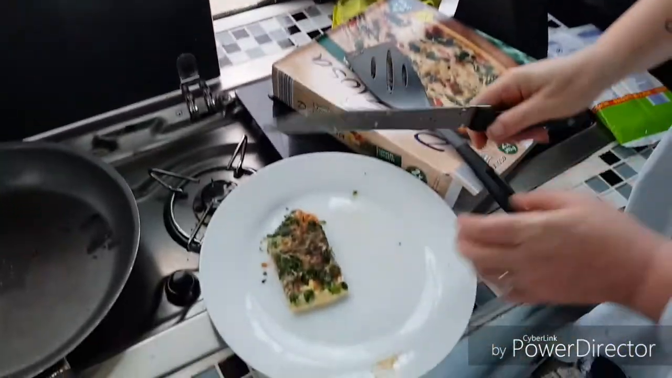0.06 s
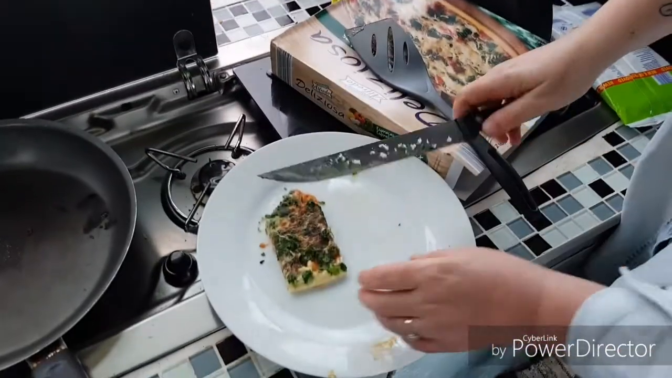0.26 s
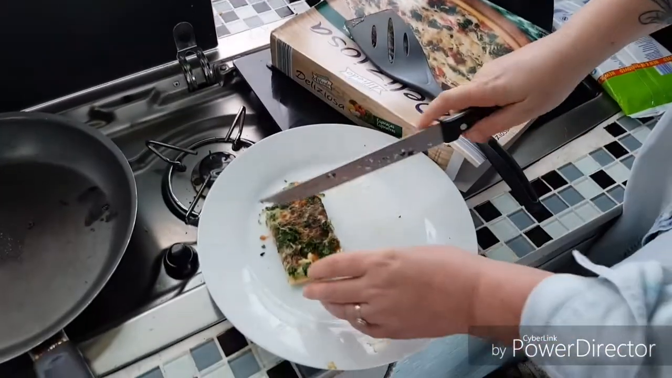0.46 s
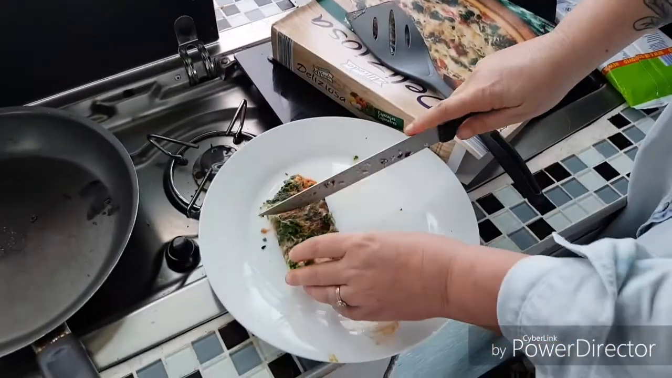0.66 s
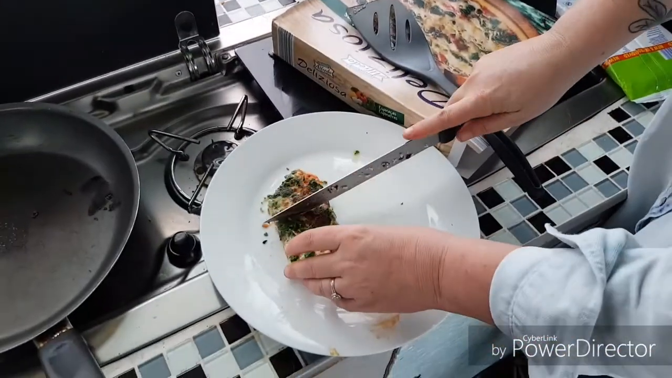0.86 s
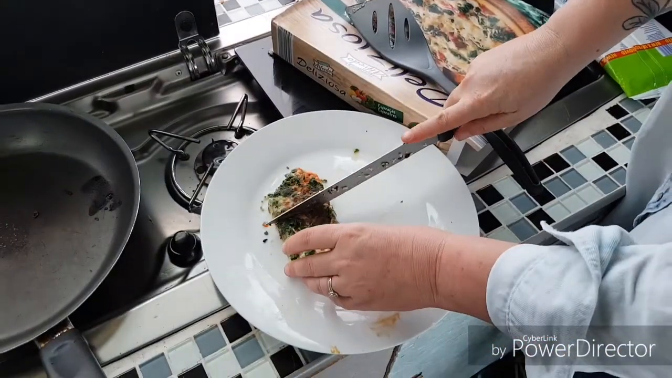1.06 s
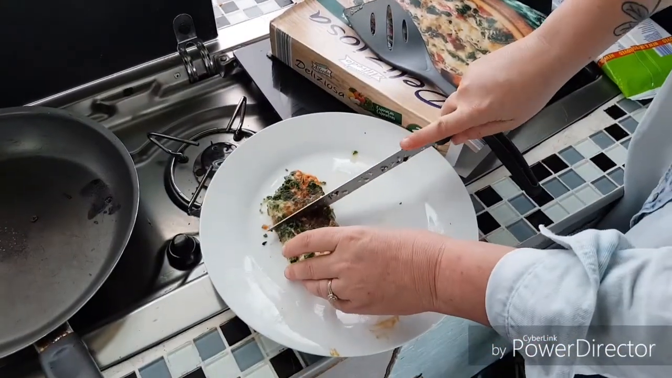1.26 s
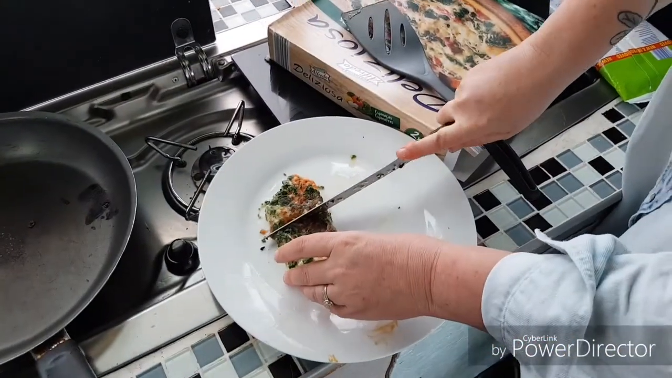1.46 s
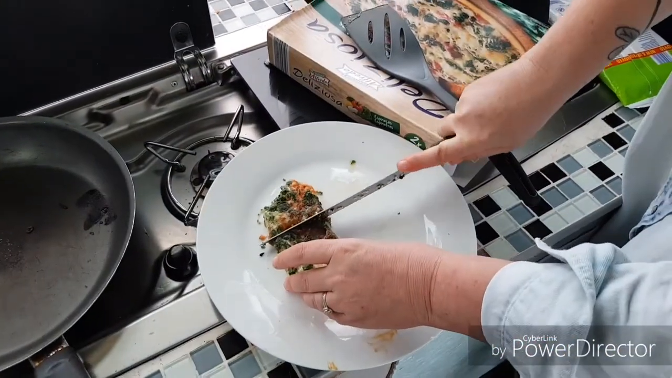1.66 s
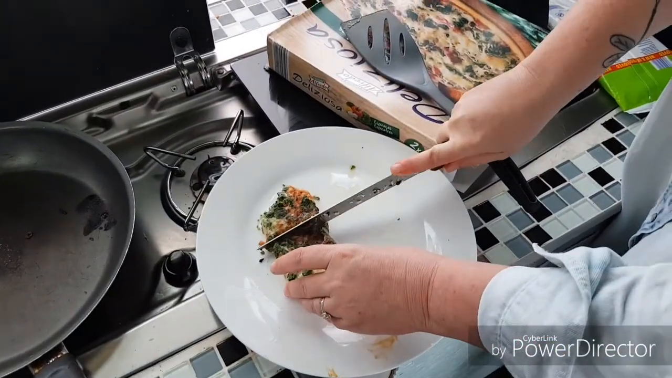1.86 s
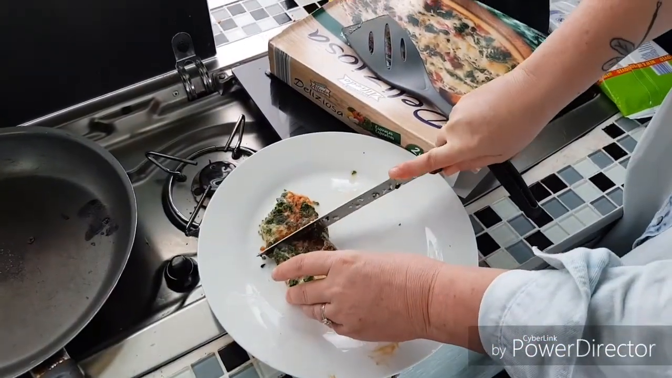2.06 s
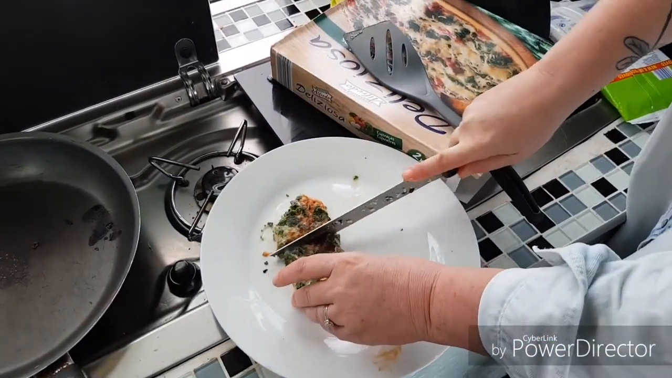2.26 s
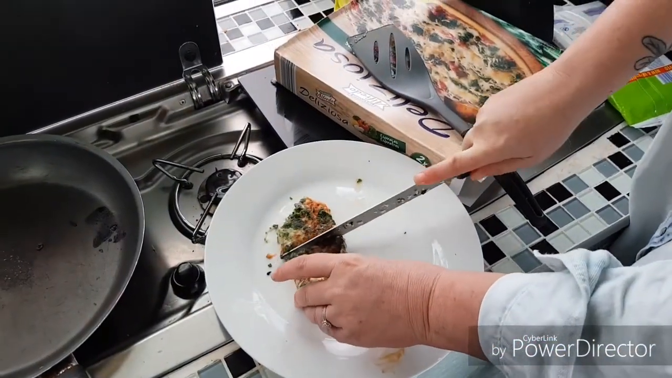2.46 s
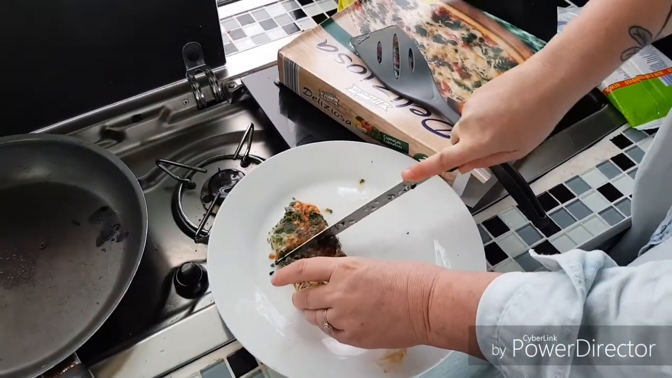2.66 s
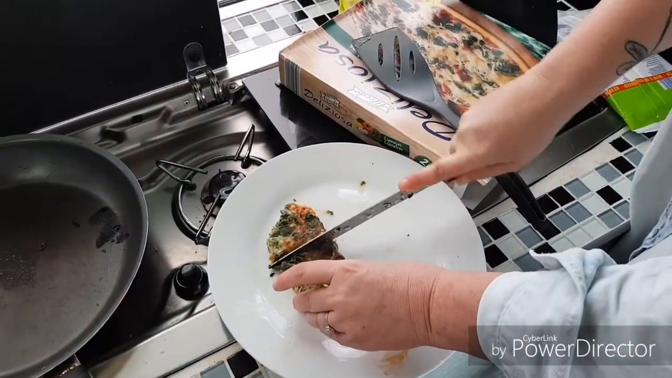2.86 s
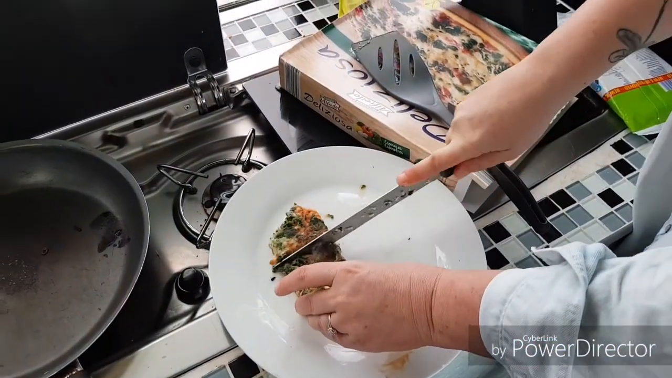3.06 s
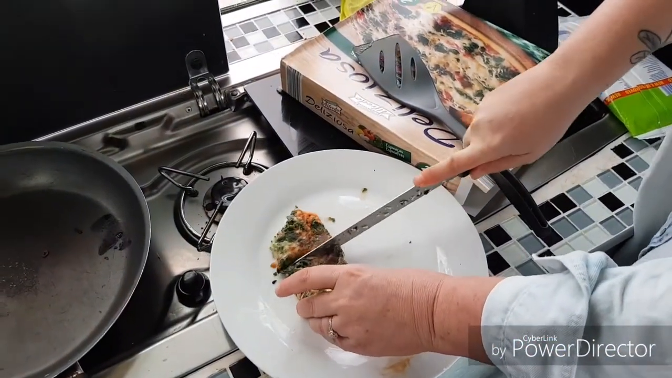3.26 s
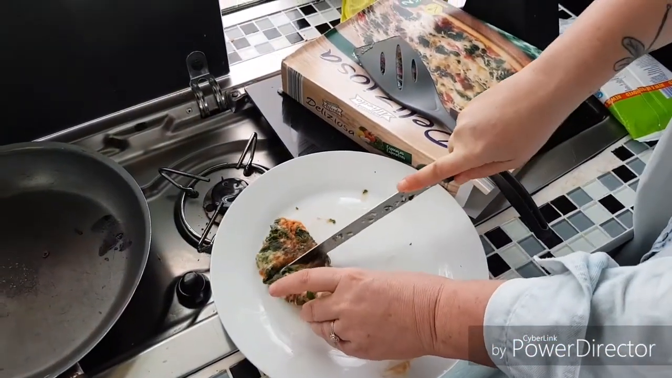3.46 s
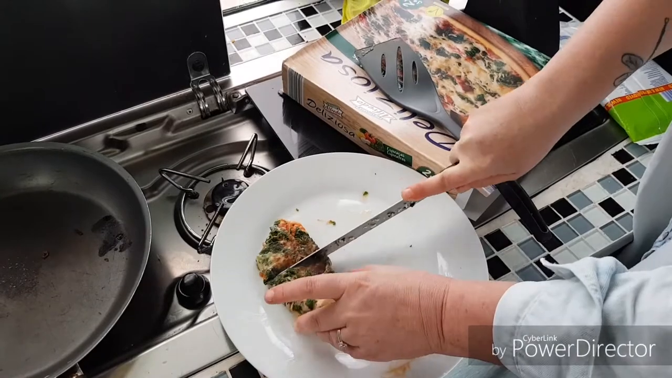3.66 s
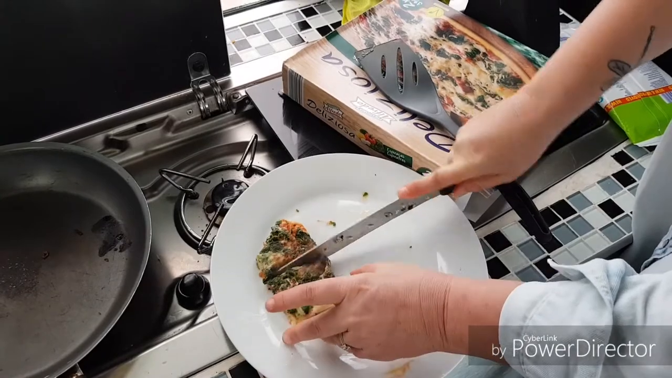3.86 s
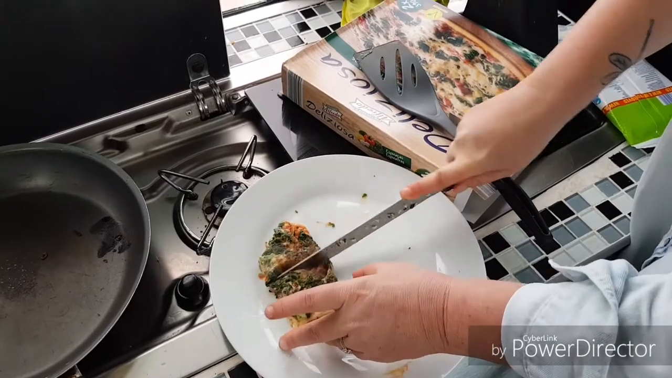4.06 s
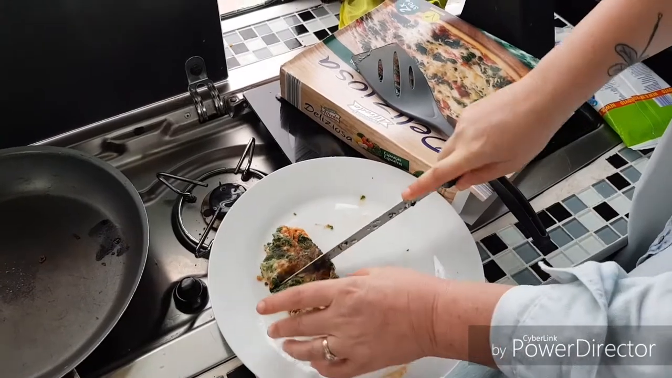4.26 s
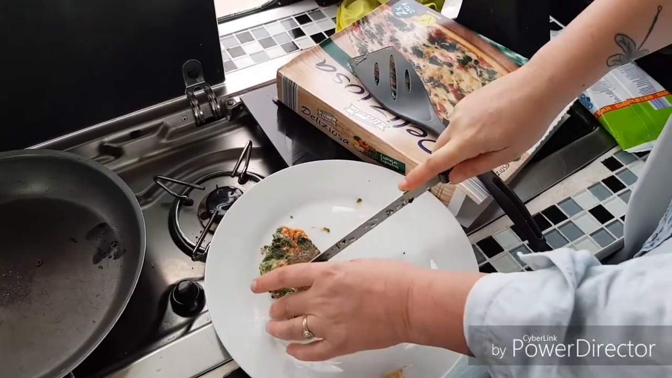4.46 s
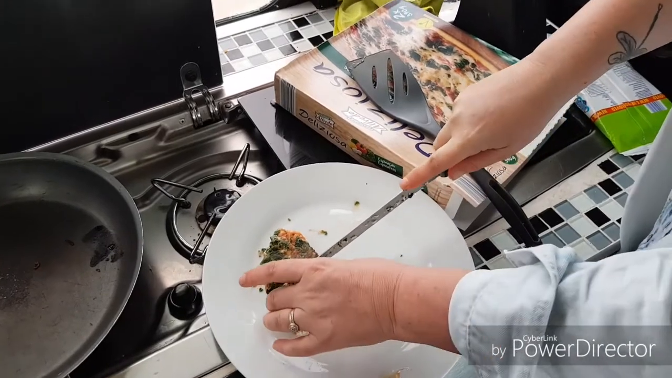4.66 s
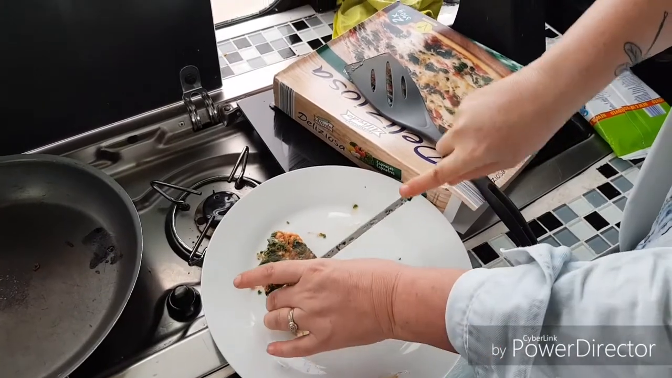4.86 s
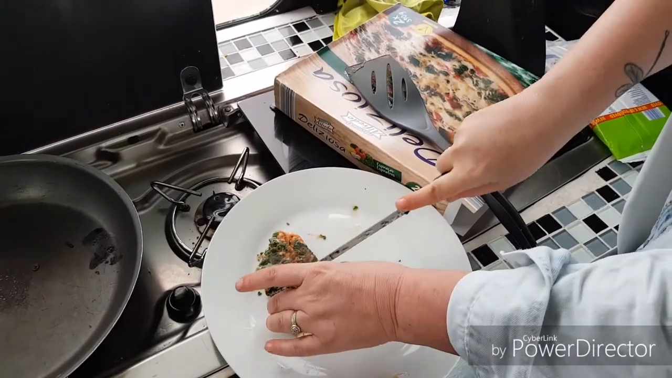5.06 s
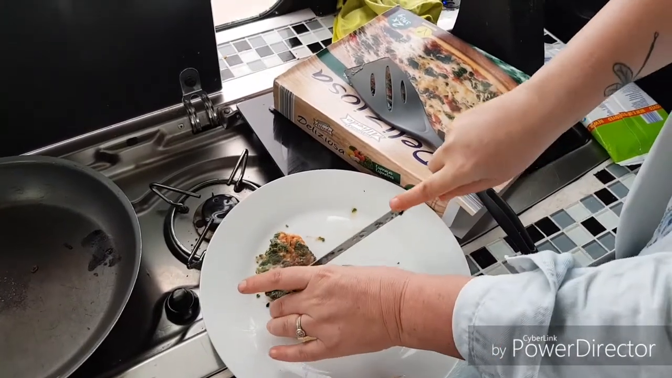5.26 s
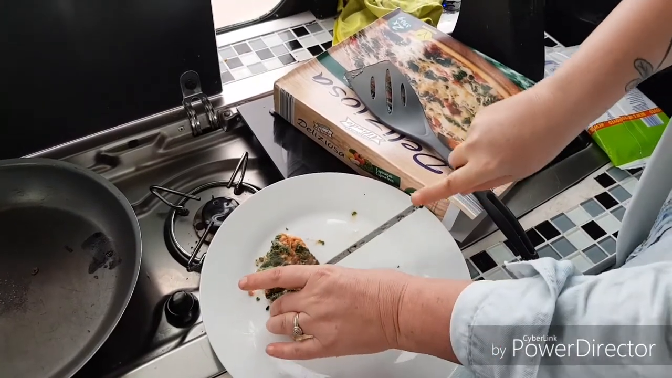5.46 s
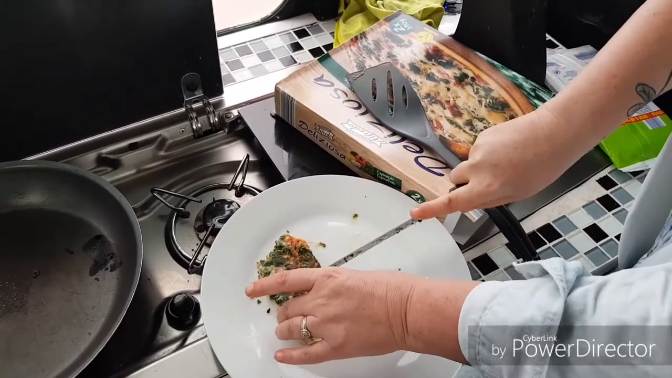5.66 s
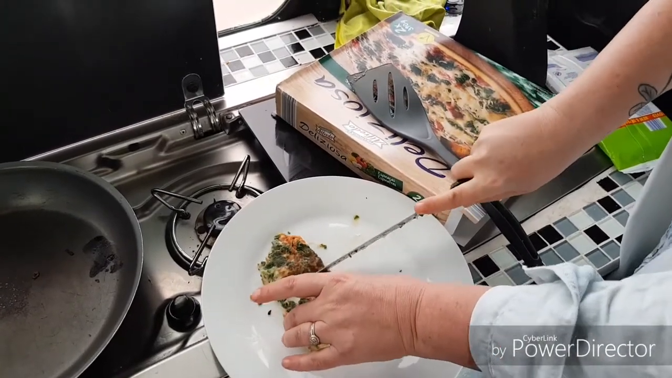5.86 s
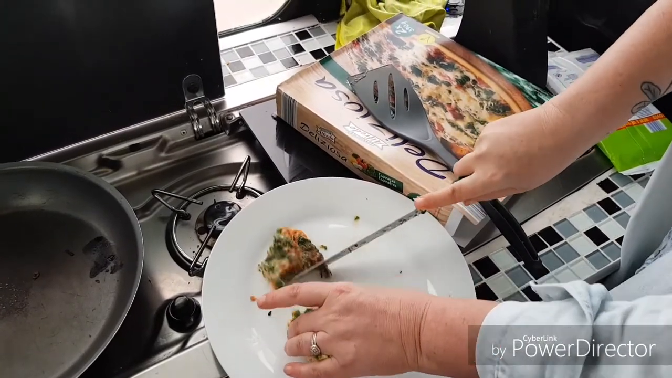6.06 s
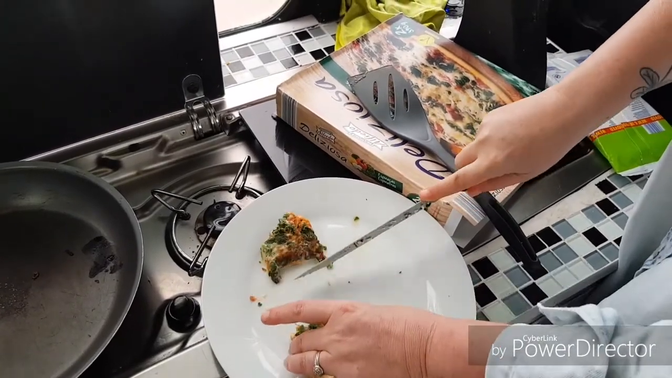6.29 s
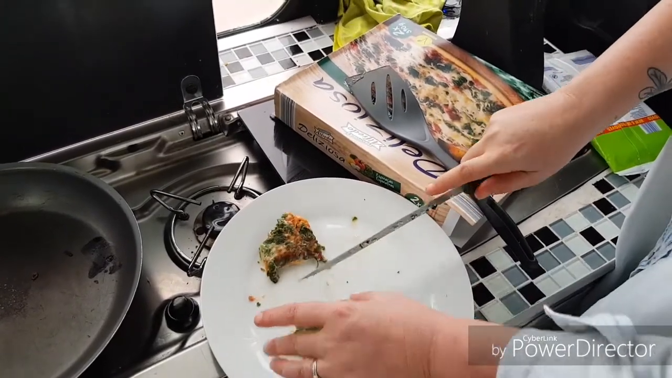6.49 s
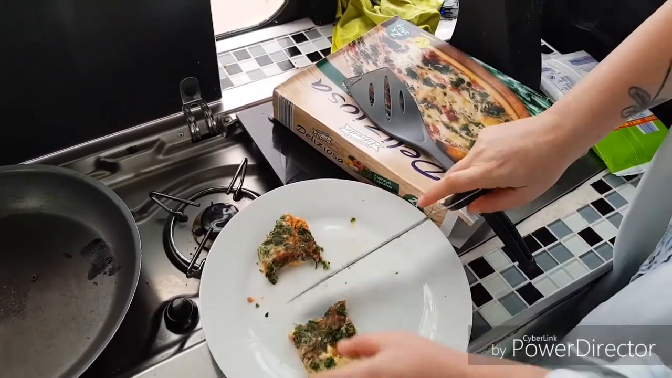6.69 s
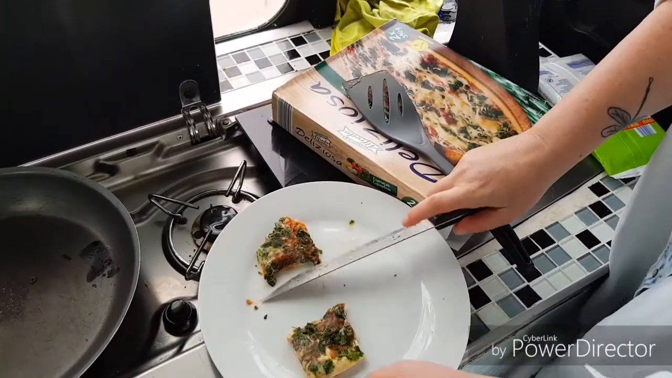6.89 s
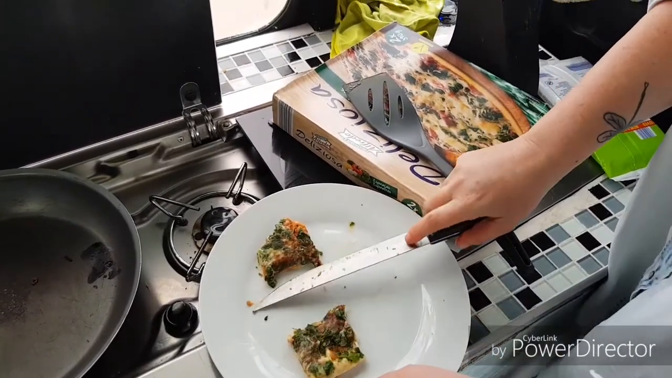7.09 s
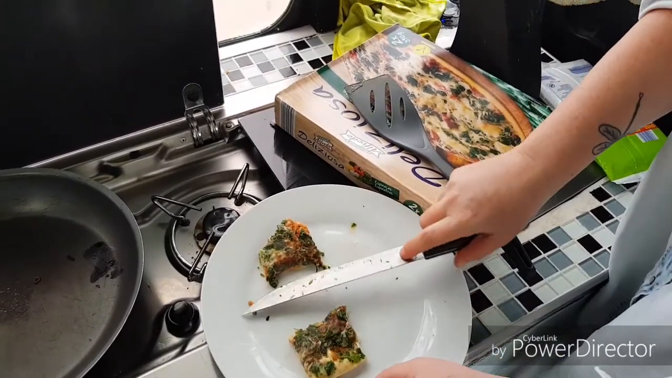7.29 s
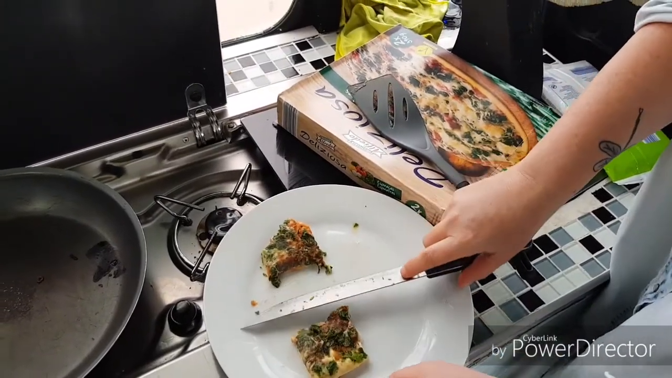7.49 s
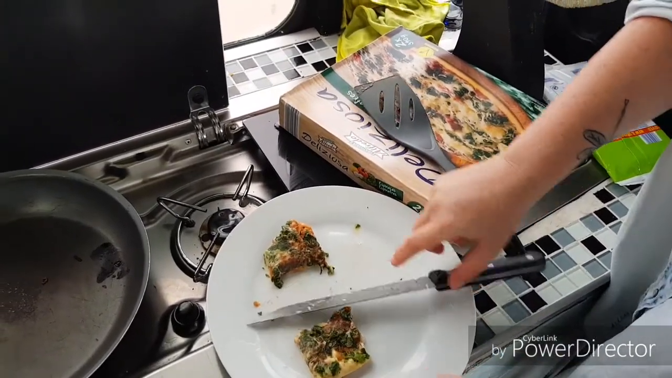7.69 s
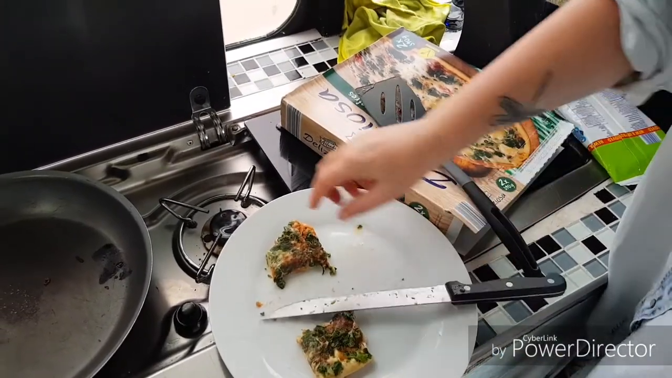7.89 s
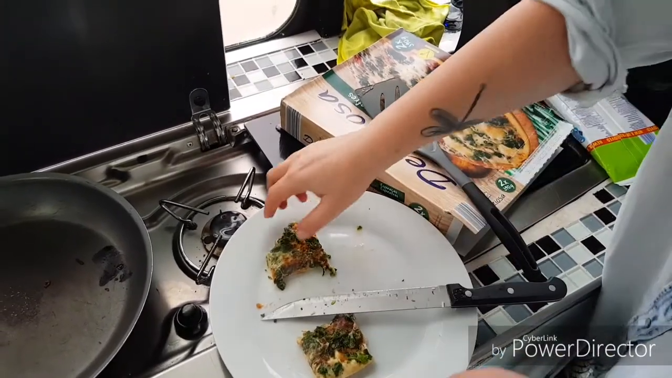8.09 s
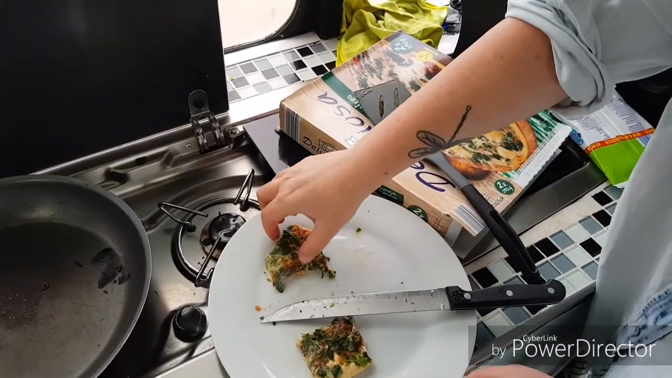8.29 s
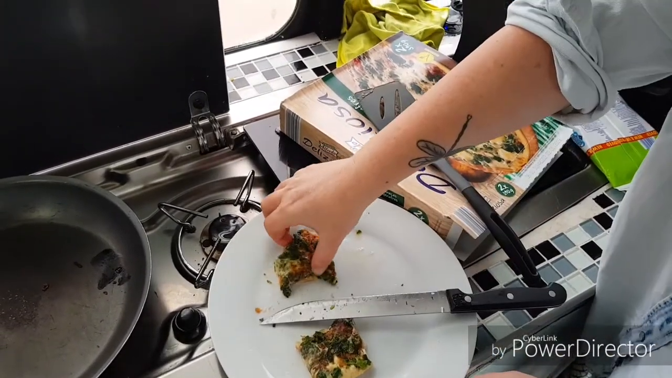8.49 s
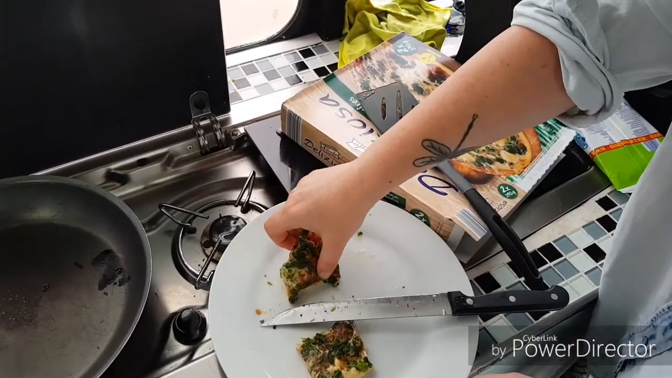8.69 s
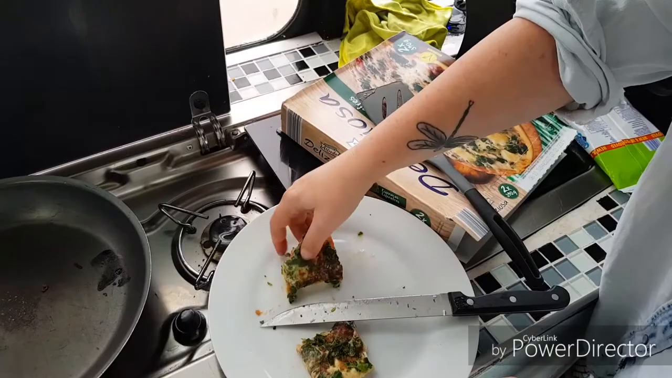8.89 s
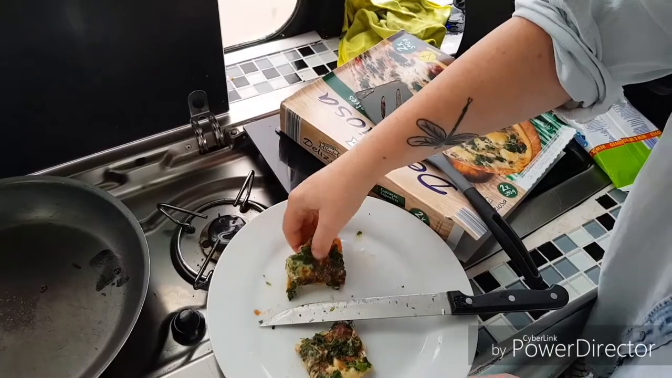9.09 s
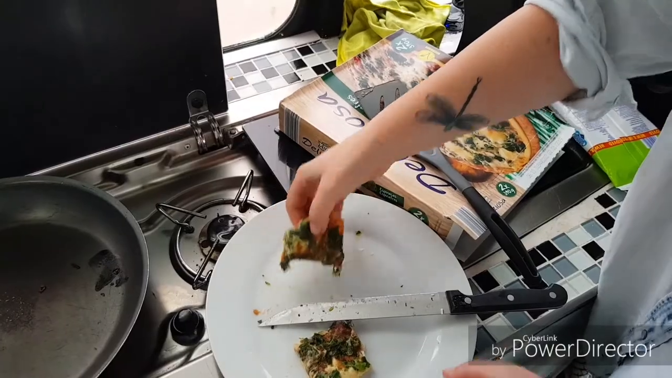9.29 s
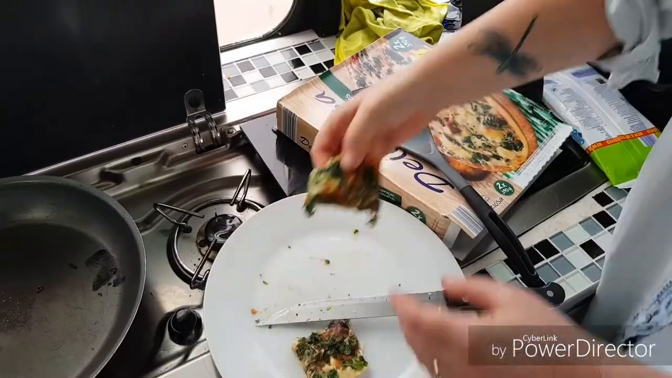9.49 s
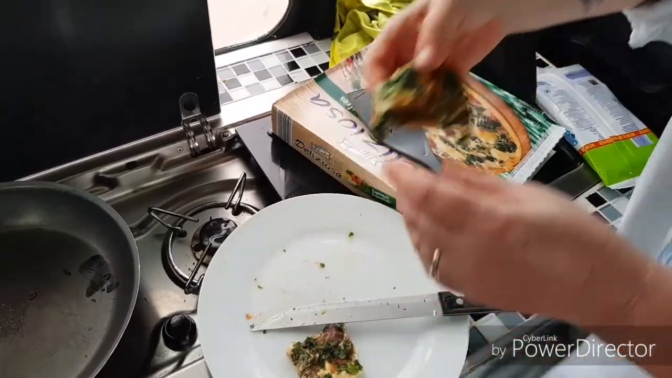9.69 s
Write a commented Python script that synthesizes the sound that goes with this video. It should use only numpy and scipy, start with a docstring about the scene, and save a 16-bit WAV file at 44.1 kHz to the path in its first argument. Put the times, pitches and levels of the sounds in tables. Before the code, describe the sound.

Soft crust crackles and faint scraping, then hard steel-on-china clinks, a brief squeak, and a dropped knife rattling on a plate in a small kitchen.

```python
"""Knife and crust on a china plate

A steel knife saws through a crusty slice on a china plate in a small kitchen, close to a phone.
It breaks through and clinks, slides on the glaze, is tapped down and dropped across the rim, where it bounces.
Clinks, slides and rattle excite decaying modes of plate and blade; a bare squeak is a wavering tone.
Crust crackles in short noise bursts; shaped noise makes the low room hum, rustling sleeves and hiss.
"""
import sys
import numpy as np
from scipy import signal
from scipy.fft import rfft, irfft, next_fast_len
from scipy.io import wavfile
from scipy.ndimage import uniform_filter1d, minimum_filter1d, map_coordinates

SR = 44100
rng = np.random.default_rng(int(sys.argv[2]) if len(sys.argv) > 2 else 0)


def dump_mix(stems):
    """Bounce the given channels to the path in sys.argv[1] as a 16-bit WAV at rate SR."""
    frames = np.atleast_2d(stems).T  # one column per channel
    limited = np.clip(frames, -1, 1)  # hard clip at full scale
    pcm = np.round(limited * 32767).astype(np.int16)
    wavfile.write(sys.argv[1], SR, pcm)


N = 429616

# Relative room hum level over time: time_s, level_db
ROOM_LEVEL = [(0, -46), (3, -46), (4.4, -47.5), (5.3, -45.5), (6.9, -47), (7.3, -49.5), (8.1, -46),
              (8.5, -48.5), (9.74, -45)]
# Hands and sleeves moving, before random wavering: time_s, rustle_db, hiss_db
STIR = [(0, -67.5, -69), (.22, -63.5, -61.5), (.59, -64.5, -59.5), (.7, -66, -67), (1.65, -67.5, -67.5),
        (1.95, -62, -62.5), (2.55, -65.5, -67.5), (2.9, -64, -61), (3.47, -67, -61), (3.75, -60.5, -65.5),
        (4.3, -76.5, -68), (5.0, -68, -67.5), (5.55, -66.5, -64), (6.4, -68, -71.5), (6.7, -62, -64),
        (7.3, -68.5, -67), (7.7, -70.5, -70.5), (8.25, -64.5, -69.5), (8.45, -73, -69.5), (8.92, -68, -72),
        (9.12, -57.5, -64.5), (9.21, -73.5, -73), (9.4, -58, -67), (9.57, -68, -68.5), (9.74, -63.5, -66)]
# Relative noise spectra of room hum, cloth and food, and fine hiss: freq_hz, density_db (per Hz)
HUM_SPECTRUM = [(12, -40), (20, -13.5), (81, 1.5), (144, -1.5), (205, -6.5), (293, -5.5), (325, -7.5),
                (384, -7.5), (427, -11.5), (474, -12), (1070, -18), (1600, -25), (3000, -40.5),
                (3900, -61.5), (6600, -120)]
RUSTLE_SPECTRUM = [(900, -35), (1800, 5), (2700, -7.5), (3600, 0), (5000, -9), (7500, -47.5), (9000, -52.5)]
HISS_SPECTRUM = [(3000, -1), (6000, 0.5), (9000, -3.5), (12500, -2), (14000, -5.5), (16000, -14.5)]
# Left-right likeness of the noises: freq_hz, correlation (-1 to 1)
STEREO_LIKENESS = [(60, 0.98), (180, 0.97), (550, 0.75), (1650, -0.3), (4970, 0.14), (15000, -0.22)]
# Crust cracking, relative levels: start_s, peak_db, pitch_hz
CRACKS = [(0.1785, -41, 7920), (0.5367, -48, 3400), (1.0703, -52, 3280), (1.3316, -45, 3690),
          (1.435, -51, 4220), (1.61, -49.5, 3000), (1.84, -47, 4500), (2.0369, -43.5, 9930),
          (2.2528, -44.5, 5810), (2.2814, -47, 8000), (2.305, -44.5, 6000), (2.5197, -49, 3580),
          (2.5794, -52.5, 3700), (2.9001, -44, 3720), (3.608, -54, 6000), (4.367, -49, 4660),
          (4.8087, -52.5, 3305), (4.9293, -50.5, 3900), (5.3644, -52.5, 3970), (5.5872, -41, 10980),
          (5.7014, -42, 3654), (6.1255, -50, 3900), (6.3494, -48, 4620), (6.8171, -54, 5285),
          (7.0768, -51, 3800), (7.5387, -49.5, 3890), (7.6972, -50, 10720), (8.1899, -49, 4510),
          (8.2182, -46.5, 4250), (8.3838, -53, 5120), (8.4974, -49, 7480), (8.6923, -55, 5075),
          (9, -51, 3600), (9.0615, -54, 11000), (9.0743, -50, 11000), (9.1162, -47.5, 3880),
          (9.2945, -54, 6000), (9.3816, -50.5, 3560), (9.7037, -51.5, 3580)]
# Knife on china, relative levels: start_s, pressed_db, tapped_db, loose_db, bowl_db, treble_db,
# damping_x (by hand and food)
CLINKS = [(1.346, -54, -53.5, -68, -52, 5, 3), (1.7829, -41.5, -48, -49, -42, 4.5, 3.1),
          (1.98, -46, -50, -70, -47, 6, 4.4), (2.744, -52, -60.5, -74, -55, 0.5, 3.7),
          (2.976, -27, -27.5, -70, -26.5, 0.7, 4.1), (3.1363, -60, -50, -73, -47.5, 0.3, 3),
          (3.349, -56, -37, -75, -37, 10, 4.55), (3.364, -64, -41.5, -69, -59, 6.5, 4.6),
          (3.425, -51, -60.5, -57.5, -55, 11, 4.3), (3.4388, -59, -47.5, -45.5, -52, 8.5, 3.2),
          (3.4844, -61, -48.5, -62, -47, 3, 4.9), (3.511, -59, -59, -45, -46, 6, 4.4),
          (3.7192, -51, -50, -69, -44.5, 1, 3.6), (3.747, -39, -39.5, -76, -35, 0.5, 5.8),
          (3.7734, -41, -44, -73, -40, 0, 4.2), (3.7901, -61, -39.5, -68, -43, 4, 4.2),
          (5.1499, -11.5, -63.5, -74, -20, -3.5, 3.2), (5.3645, -47.5, -80, -75, -55, -3.5, 3.2),
          (5.586, -50, -68, -75, -47, 3, 2.9), (5.6327, -17.5, -38, -67, -24, -4, 3.7),
          (5.8657, -52, -77.5, -62, -49, -12, 2.5), (6.171, -42, -75, -75, -51, -6.5, 1.9),
          (6.329, -53, -70, -60, -44, -3, 3.2), (6.6298, -54, -64.5, -67, -68, 4.5, 2.2),
          (6.883, -31, -19, -48.5, -16, -5.5, 1.3), (6.9064, -61, -18, -42.5, -17.5, -2, 2.13),
          (7.2404, -55, -61.5, -73.5, -72, 9, 1.93), (7.5115, -84, -65, -52.5, -60.5, 8, 1.6),
          (7.7305, -41, -50, -72, -43, 3.5, 0.67), (7.7372, -34, -42, -74, -36, 0.5, 0.64),
          (7.7563, -30, -35, -76, -33.5, 1, 2.23), (7.7865, -32, -42, -40, -54, 0, 3.4),
          (7.7957, -33.5, -49.5, -60, -48, 4, 1.7), (7.8981, -53, -32.5, -15.5, -16, 1.5, 2.2),
          (7.9472, -39, -44.5, -24.5, -29, 4, 1.8), (7.9629, -41, -46, -16.5, -44, 0, 3.5),
          (7.9824, -57, -35, -37.5, -35, 10, 3.2), (8.027, -46, -61.5, -43, -50, 3.5, 2.4),
          (8.0548, -48, -44.5, -27.5, -23, 4, 2.1), (8.0859, -34, -52.5, -38.5, -39, -0.5, 1.9),
          (8.1388, -35.5, -65, -43.5, -41, -0.3, 2.7)]
# Modes of plate and blade in contact: freq_hz
CONTACT_HZ = [382, 641, 716, 1104, 1272, 1314, 1354, 1495, 1745, 1970, 2140, 2300, 2410, 2665, 3490, 3663,
              4050, 4400, 4607, 5303, 6165, 6978, 7870, 8527, 9400, 9930, 10730, 11580]
# The same modes, nominal ring: pressed_db (through food), tapped_db (bare glaze), loose_db (knife lying),
# t60_s, lean_db (left over right), lead_rad (left ahead)
CONTACT_MODES = [(-17, -11, -4.5, 0.24, -2, -0.15), (-17, -28, -11.0, 0.54, 2.5, 1.3),
                 (-11, -49, -12.5, 0.078, 3, 1.2), (-37.5, -29.5, -6.5, 0.1, 0.5, -1.3),
                 (-35.5, -27, -6.5, 0.3, -1, 3), (-33.5, -21.5, -5.5, 0.1, -6.5, 0),
                 (-27.5, -24.5, -10.5, 0.044, -2, -1.1), (-13.5, -17, -10.5, 0.3, -0.8, 3),
                 (-17.5, -10, -30.5, 0.24, -5.5, 3.5), (-0.5, -28, -12, 0.11, -4.5, 1.37),
                 (-11.5, -3, -15, 0.12, -5.3, 1.3), (-18, -1.5, 0, 0.082, 5, 3),
                 (-1, -2, -45.0, 0.07, 8.5, 1.15), (-29.5, -20, -4.5, 0.046, -2.5, -2.5),
                 (-8, -15.5, -15, 0.1, -2.5, 1), (-10, 0.5, -40, 0.088, 8.5, 1.5),
                 (-3.5, -11.5, -52, 0.095, -1, -1.5), (-22.5, -13, -16.5, 0.12, 4, -1),
                 (-11, -4, -17.0, 0.068, 8.5, 2), (-21.5, -14.5, -20.5, 0.1, -13, 1),
                 (-17, -12, -27, 0.14, -7.5, 1.5), (-29.5, -7, -18.5, 0.14, 3.5, 4.5),
                 (-28.5, -11, -28.5, 0.34, 5, 0.44), (-32.5, -15.5, -30, 0.18, 2, 3.5),
                 (-35, -14.5, -47.5, 0.12, 3, 2), (-25, -3.5, -39.5, 0.2, -3.5, 2),
                 (-43, -17.5, -35.5, 0.26, 1.5, -2.2), (-51, -15, -15.5, 0.079, 3.3, -1.9)]
# The plate's main mode, then steel tip and shank modes: freq_hz, level_db, t60_s, lean_db, lead_rad
BOWL = (1537, 0, .2, -5.5, -.1)
TIP = [(12390, -6, .1, 6, .2), (12520, 0, .11, 3, -.5), (12740, -9, .1, 5, .2)]
SHANK = (1922, 0, .3, .5, 1.2)
# How each strike reaches the tip, and leans left over right: pressed_db, tapped_db, loose_db
TIP_REACH_DB = [-29, -14, -24.5]
STRIKE_LEAN_DB = [1.4, 2, -0.3]
# The edge slides on the glaze: start_s, peak_s, end_s, level_db, bowl_db
SLIDES = [(2.76, 2.955, 2.958, -56, -57.5), (2.995, 3.0, 3.04, -51.5, -53), (3.14, 3.17, 3.29, -55, -57.5),
          (3.37, 3.385, 3.45, -59, -69), (3.4, 3.515, 3.55, -53, -52), (5.02, 5.1, 5.135, -52, -51),
          (5.125, 5.142, 5.144, -36, -37.5), (5.166, 5.17, 5.263, -34.5, -40),
          (5.34, 5.376, 5.45, -48, -53.5), (5.39, 5.45, 5.53, -52.5, -52),
          (5.575, 5.626, 5.629, -40.5, -40), (5.845, 5.868, 5.9, -52.5, -55.5),
          (5.89, 5.998, 6.06, -62, -60), (6.14, 6.224, 6.3, -36, -42), (6.3, 6.33, 6.38, -52, -47)]
# Contacts that set the shank ringing: start_s, level_db
SHANK_RINGS = [(2.9765, -49), (5.151, -33.5), (5.6335, -41), (6.8845, -41), (7.755, -51), (7.797, -38.5),
               (7.8999, -21.5), (7.946, -23), (7.963, -16.5), (8.055, -42)]
# The edge sticks and slips on the glaze, nominal path: time_s, pitch_hz, level_db
SQUEAK = [(6.165, 3800, -62), (6.179, 3996, -49.5), (6.245, 4060, -37), (6.28, 3670, -71)]
# The loose knife rocks on the rim: start_s, peak_s, end_s, level_db
RATTLE = [(7.737, 7.74, 7.82, -30.5), (7.794, 7.798, 7.86, -37.5), (7.902, 7.905, 8.08, -19.5),
          (8.054, 8.059, 8.15, -21.5)]
# Room decay: freq_hz, t60_s
KITCHEN_DECAY = [(300, 0.39), (2000, 0.097), (10000, 0.11)]

TOP_HZ = 15850  # upper limit of the phone's band
CUT_ENDS_S = 6.7
CHATTER_IN_FOOD_MS, CHATTER_BARE_MS = 5.6, 9.5  # food quiets the blade; bare, it chatters longer
YIELD, CHOKE_S = 0.26, 0.0026  # a contact this fraction as strong stops half the earlier ring; time it takes
TIP_KNEE_DB = -23  # taps harder than this whip the tip ever more
EDGE_DB, BEND = 24.5, 1.25  # drop from a stroke's peak to its ends; over 1 rounds the peak


def amp(db):
    """Gain of a level in dB."""
    return 10 ** (np.asarray(db) / 20)


def unit(x):
    """Scaled to rms 1."""
    return x / np.sqrt(np.mean(x ** 2) + 1e-20)


def onset(t, rise_s):
    """Exponential rise from silence, with time constant rise_s."""
    return 1 - np.exp(-t / rise_s)


def add_at(out, start_s, sound):
    """Mix a sound into out at its start time."""
    start = round(start_s * SR)
    out[..., start:start + sound.shape[-1]] += sound


def along(points, hz):
    """Values at given frequencies, read on a log axis."""
    f, value = np.transpose(points)
    return np.interp(np.log(hz + 1), np.log(f + 1), value)


def curves(rows):
    """One value per sample for each column after the time."""
    s, *columns = np.transpose(rows)
    return [np.interp(np.arange(N) / SR, s, column) for column in columns]


def wobble(rate):
    """A smooth random curve, rate knots a second."""
    knots = rng.standard_normal(int(N * rate / SR) + 4)
    return map_coordinates(knots, [np.arange(N) * rate / SR])


def filtered(x, response):
    """x times a complex response of frequency."""
    size = next_fast_len(N + SR // 2)
    spectrum = rfft(x, size) * response(np.fft.rfftfreq(size, 1 / SR))
    return irfft(spectrum, size)[..., :N]


def ports(lean_db, lead_rad):
    """Complex gains that set level and phase between the two microphone ports."""
    half = amp(lean_db / 2) * np.exp(.5j * lead_rad)
    return np.array([half, 1 / half])


def rush(spectrum, patchy_db):
    """Stereo noise of rms 1 with patches of random gain in time and frequency."""
    cells = signal.stft(rng.standard_normal((2, N)), nperseg=512)[2]
    field = uniform_filter1d(rng.standard_normal(cells.shape[1:]), 8, 0)
    field = uniform_filter1d(field, 6, 1)
    pair = signal.istft(cells * amp(patchy_db * unit(field)), nperseg=512)[1][:, :N]

    def mid_side(hz):
        turn = np.arccos(np.clip(along(STEREO_LIKENESS, hz), -1, 1)) / 2
        return amp(along(spectrum, hz)) * [np.cos(turn), np.sin(turn)]

    mid, side = filtered(pair, mid_side)
    return unit(np.array([mid + side, mid - side]))


def air():
    """Shaped noises make the low hum of the room, cloth and food rustling, and a fine hiss above."""
    hum_db, = curves(ROOM_LEVEL)
    rustle_db, hiss_db = curves(STIR)
    stir_db = 1.3 * wobble(6.3)
    lean = amp([[.4], [-.4]])
    hum = lean * amp(hum_db + .55 * wobble(5.5)) * rush(HUM_SPECTRUM, patchy_db=1.95)
    crackle = unit(amp(1.9 * wobble(70) + 2.6 * wobble(600)))  # fibres and crumbs give way in grains
    rustle = amp(rustle_db + stir_db) * crackle * rush(RUSTLE_SPECTRUM, patchy_db=3.0)
    hiss = amp(hiss_db + 0.75 * stir_db) * rush(HISS_SPECTRUM, patchy_db=2.7)
    return hum + rustle + hiss


def cracks():
    """Crust gives way in short noisy bursts around a pitch; smaller cracks fall at random."""
    out, t = np.zeros((2, N + SR)), np.arange(SR // 16) / SR
    small = rng.random((60, 3)) * [N / SR, -8, 6000] + [0, -54, 3000]
    envelope = amp(-60 * t / 0.066) * onset(t, 0.0012)
    for start_s, peak_db, hz in [*CRACKS, *small]:
        edges = np.clip([hz / 2.7, hz * 1.22], 500, 20000)
        band = signal.butter(1, edges, "band", fs=SR)
        noise = rng.standard_normal((3, len(t)))
        burst = unit(signal.lfilter(*band, noise[0] + 2.4 * noise[1:]))  # shared noise plus one per side
        add_at(out, start_s, amp(peak_db - 3.5) * envelope * burst)
    return out[:, :N]


def chatter(ms):
    """The blade lands, then bounces in sparse random taps that die away; total energy 1."""
    t = np.arange(2000) / SR
    taps = (rng.random(2000) < .008) * rng.standard_normal(2000) * np.exp(-1000 * t / ms)
    taps[0] = 3.5  # the landing
    return taps / np.linalg.norm(taps)


def clinks():
    """Each contact rings damped modes in a blend of three ways of striking, then the next chokes them."""
    out, t = np.zeros((2, N + SR)), np.arange(SR // 5) / SR
    hz = np.array(CONTACT_HZ)
    *ways_db, t60, lean_db, lead = np.transpose(CONTACT_MODES)
    free_hz, free_db, free_t60, free_lean_db, free_lead = np.transpose([BOWL, *TIP])
    turns = np.exp(2j * np.pi * np.outer(np.r_[hz, free_hz], t)).astype(np.complex64)
    ears = ports(np.r_[lean_db, free_lean_db], np.r_[lead, free_lead])
    high = np.clip(np.log2(hz / 3000), 0, 2)  # hard contacts reach the upper modes
    force = amp(np.array(CLINKS)[:, 1:5]).sum(1)
    # share of the ring that the next contact stops
    choke = np.r_[force[1:] / (force[1:] + YIELD * force[:-1]), 0]
    gaps = np.diff([row[0] for row in CLINKS], append=N / SR)

    for (start_s, *blend_db, bowl_db, treble_db, damping), stop, gap in zip(CLINKS, choke, gaps):
        blend = amp(blend_db)
        chatter_ms = CHATTER_BARE_MS if start_s > CUT_ENDS_S else CHATTER_IN_FOOD_MS

        scatter_db = rng.normal(0, 2.3, len(hz))
        china = blend @ amp(ways_db) * amp(0.52 * high * treble_db + scatter_db)
        whip = 1 + (blend[1] / amp(TIP_KNEE_DB)) ** 2
        tip = blend @ amp(TIP_REACH_DB) * whip
        free = amp(free_db) * np.r_[amp(bowl_db), [tip] * len(TIP)]

        # touch damps the tip less than the plate
        free_damping = np.r_[damping, [np.sqrt(damping)] * len(TIP)]
        rate = np.r_[damping / np.clip(t60, .03, .15), free_damping / free_t60]
        fall = np.exp(-np.log(1000) * np.outer(rate, t).astype(np.float32))
        gains = (ears * np.r_[china, free]).astype(np.complex64)
        ring = (gains @ (turns * fall)).imag

        noise = rng.standard_normal((3, len(t)))  # the many small modes die fast
        small_modes = amp(0.92 * treble_db - 7.5 - 60 * damping * t / 0.086)
        ring += np.linalg.norm(china[hz > 3000]) * small_modes * (noise[0] + 0.79 * noise[1:])
        ring *= onset(t, 0.0012 + .00012 * chatter_ms)  # a chattering edge lands less sharply
        ring *= 1 - stop * onset(np.clip(t - gap, 0, None), CHOKE_S)
        ring = signal.fftconvolve(ring, chatter(chatter_ms)[None], axes=1)

        pan_db = blend @ STRIKE_LEAN_DB / blend.sum()
        add_at(out, start_s, amp(5.0 + pan_db * np.array([[.5], [-.5]])) * ring)

    tone = [(500, -5.0), (900, 1.0), (12900, 2), (13500, -9), (15000, -14)]  # freq_hz, gain_db
    return filtered(out[:, :N], lambda f: amp(along(tone, f)))


def thumps():
    """The worktop thumps under the loose handle: three low sines that decay together."""
    out, t = np.zeros(N + SR), np.arange(SR // 5) / SR
    wood = np.sin(2 * np.pi * 100 * t)
    wood += 0.88 * np.sin(2 * np.pi * 165 * t)
    wood += 0.56 * np.sin(2 * np.pi * 255 * t)
    wood *= amp(-60 * t / 0.14) * onset(t, .006)  # a soft, heavy contact
    for start_s, _, _, loose_db, *_ in CLINKS:
        add_at(out, start_s, amp(loose_db - 10.0) * wood)
    return out[:N]


def along_strokes(strokes, column):
    """Gain per sample: each stroke swells to its peak and fades, silent outside."""
    t, gain = np.arange(N) / SR, 0
    for row in strokes:
        start, peak, end = np.sort(row[:3])
        away = np.abs(np.interp(t, [start, peak, end], [-1, 0, 1]))
        gain = gain + (away < 1) * amp(row[column] - EDGE_DB * away ** BEND)
    return gain


def rubbing(strokes, way, width, grain_db):
    """Uneven grains of contact drive the modes, widened by the touch, along each stroke."""
    grains = rng.standard_normal(N) * amp(grain_db * wobble(90) + 1.2 * wobble(900))
    drive = unit(grains)[None] * along_strokes(strokes, column=3)
    size = next_fast_len(SR // 4)
    f, body = np.fft.rfftfreq(size, 1 / SR), 0
    for k, (hz, row) in enumerate(zip(CONTACT_HZ, CONTACT_MODES)):
        w = width / row[3]  # resonance width, Hz
        resonance = 1j * f * np.sqrt(w) / (hz * hz - f * f + 1j * f * w)
        sign = (-1) ** k  # neighbouring modes alternate
        body = body + ports(*row[4:])[:, None] * sign * amp(row[way]) * resonance
    ring = irfft(body, size)
    ring /= np.sqrt(np.sum(ring ** 2) / 2)
    return signal.fftconvolve(drive, ring, axes=1)[:, :N]


def bowl_hum():
    """Sliding keeps the plate's main mode sounding as a narrow, wavering line of resonant noise."""
    hz, _, t60, lean_db, lead = BOWL
    ears = ports(lean_db, lead)[:, None]
    line = lambda f: ears * f / (hz * hz - f * f + 1j * f * 7 / t60)
    return along_strokes(SLIDES, column=4) * unit(filtered(rng.standard_normal(N), line))


def shank():
    """The shank is never touched: one long, clean ring for each contact that reaches it."""
    hz, _, t60, lean_db, lead = SHANK
    out, t = np.zeros((2, N + SR)), np.arange(SR // 3) / SR
    tone = (ports(lean_db, lead)[:, None] * np.exp(2j * np.pi * hz * t)).imag
    ring = tone * amp(-60 * t / t60) * onset(t, .004)
    for start_s, level_db in SHANK_RINGS:
        add_at(out, start_s, amp(level_db) * ring)
    return out[:, :N]


def squeak():
    """Stick-slip as a rough tone: pitch and strength of the slips waver fast."""
    hz, level_db = curves(SQUEAK)
    sample = np.arange(N)
    on = (sample > SQUEAK[0][0] * SR) & (sample < SQUEAK[-1][0] * SR)
    gate = uniform_filter1d(1. * on, size=400)  # soft ends
    phase = 2 * np.pi * np.cumsum(hz + 45 * wobble(140)) / SR
    level = amp(level_db + 2.5 + 2.9 * wobble(120))
    return gate * level * np.sin(phase + [[0], [1.2]])


def kitchen(x):
    """Room answer by convolution with noise in which each frequency dies at its own speed."""
    hz, t, cells = signal.stft(rng.standard_normal((2, SR // 3)), SR, nperseg=256)
    decay = amp(-60 * t / along(KITCHEN_DECAY, hz)[:, None])
    tail = signal.istft(cells * decay, SR, nperseg=256)[1]
    delayed = np.pad(x, ((0, 0), (150, 0)))  # samples before the answer starts
    return signal.fftconvolve(delayed, tail / np.linalg.norm(tail[0]), axes=1)[:, :N]


def scene():
    """Knife, plate and crust with the room's answer, over worktop thumps and air."""
    slides = rubbing(SLIDES, way=0, width=7.5, grain_db=3.0) + bowl_hum()
    rattle = rubbing(RATTLE, way=2, width=4.1, grain_db=6)
    near = cracks() + clinks() + slides + shank() + squeak() + rattle
    return near + amp(-7) * kitchen(near) + thumps() + air()


def limited(x, top):
    """Gain dips smoothly around peaks, a few milliseconds either side, to keep them under top."""
    need = np.minimum(1, top / (np.abs(x).max(0) + 1e-9))
    return x * uniform_filter1d(minimum_filter1d(need, size=441), size=221)


def record(dry):
    """The phone limits the loudest peaks and keeps nothing above its band limit."""
    return filtered(limited(dry, top=.9), lambda hz: hz < TOP_HZ)


dry = scene()
out = record(dry)
dump_mix(out)
```